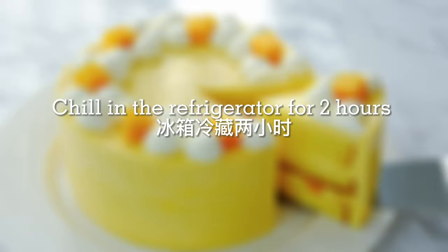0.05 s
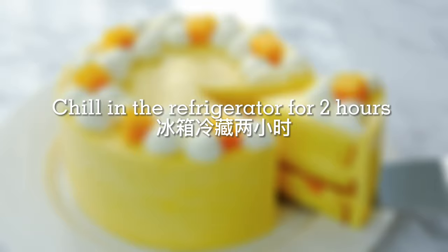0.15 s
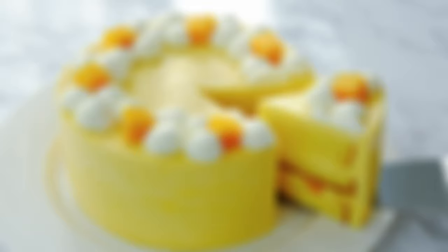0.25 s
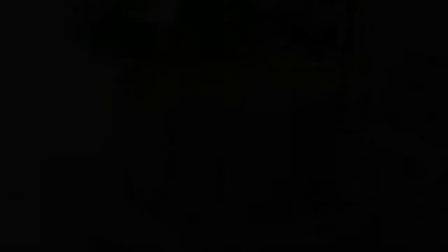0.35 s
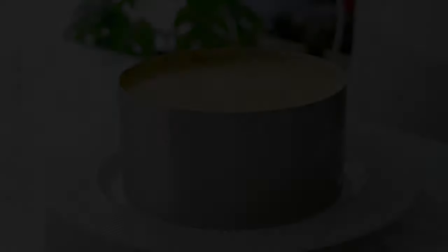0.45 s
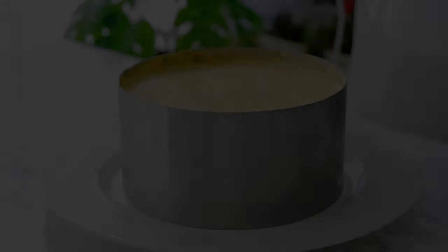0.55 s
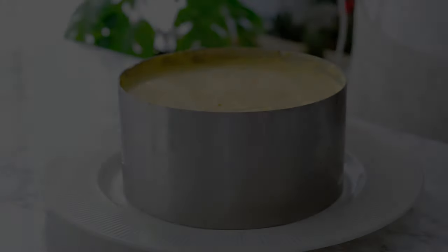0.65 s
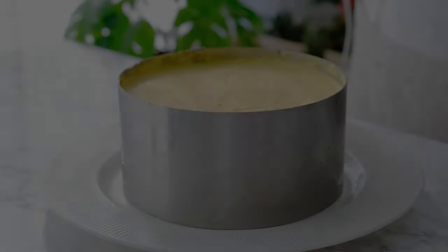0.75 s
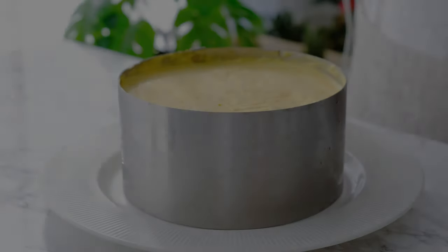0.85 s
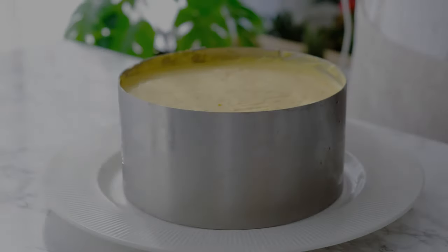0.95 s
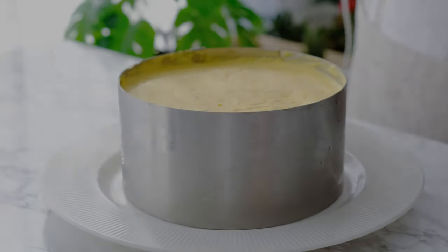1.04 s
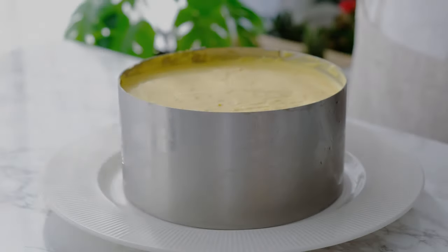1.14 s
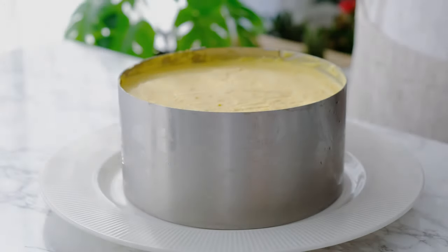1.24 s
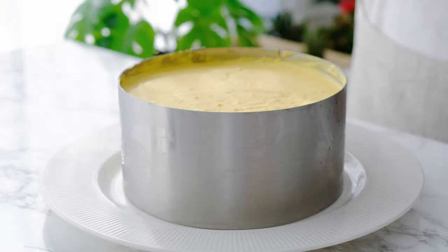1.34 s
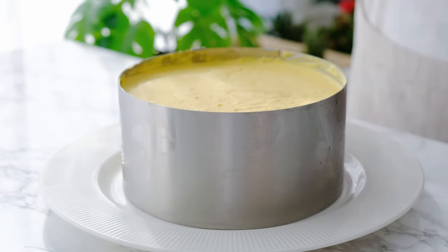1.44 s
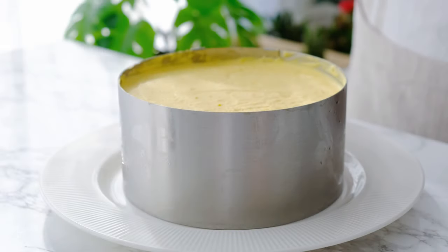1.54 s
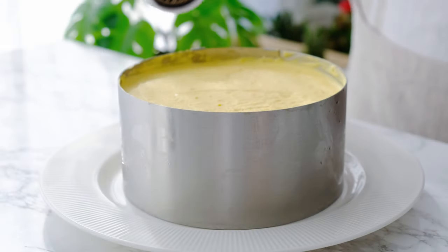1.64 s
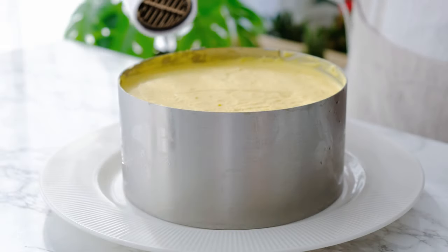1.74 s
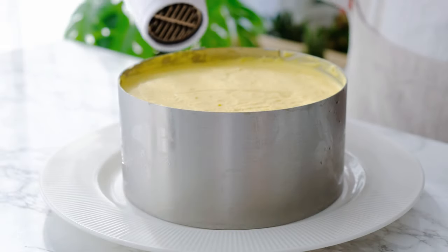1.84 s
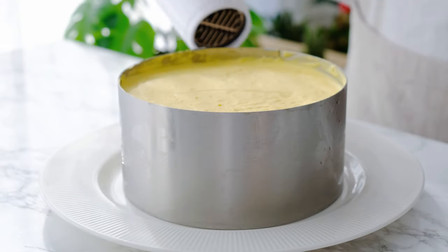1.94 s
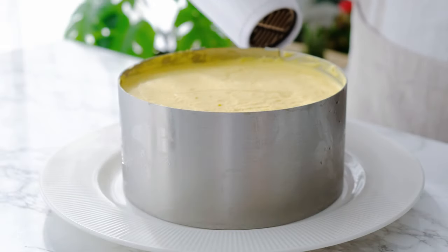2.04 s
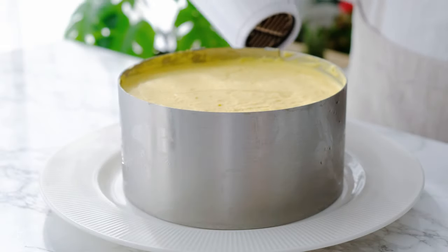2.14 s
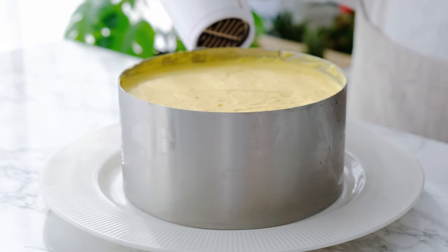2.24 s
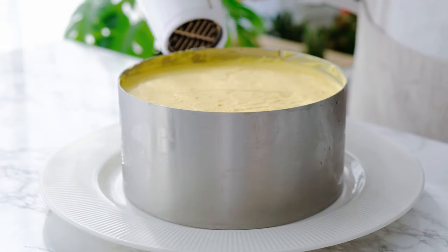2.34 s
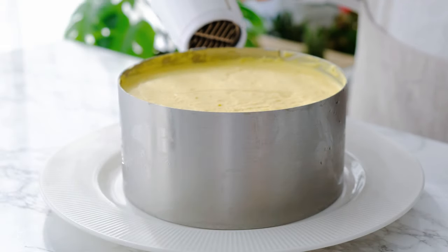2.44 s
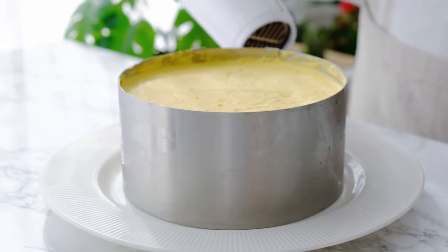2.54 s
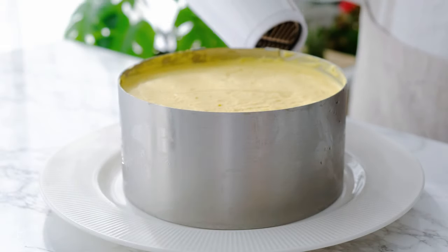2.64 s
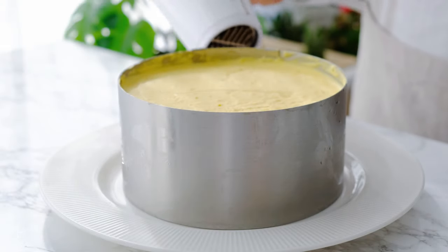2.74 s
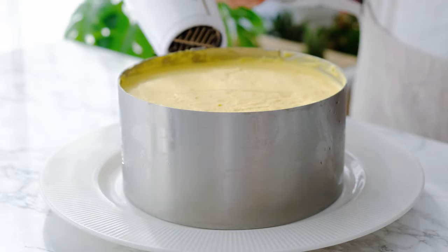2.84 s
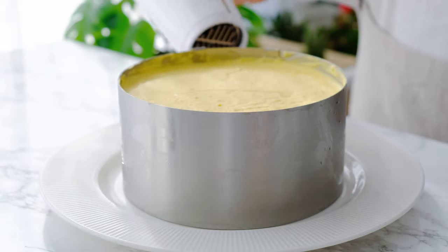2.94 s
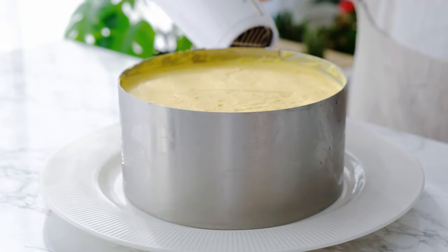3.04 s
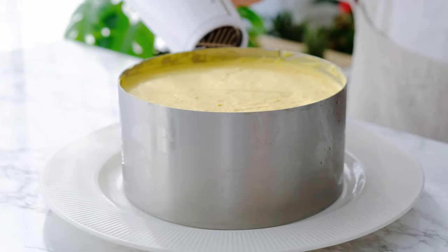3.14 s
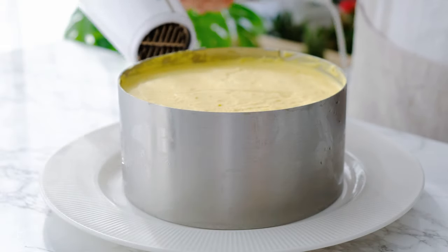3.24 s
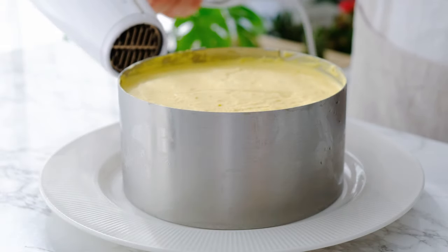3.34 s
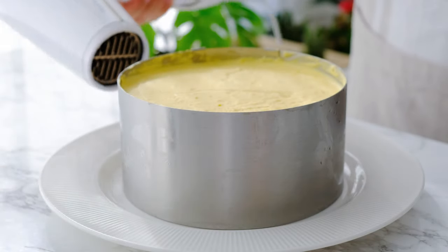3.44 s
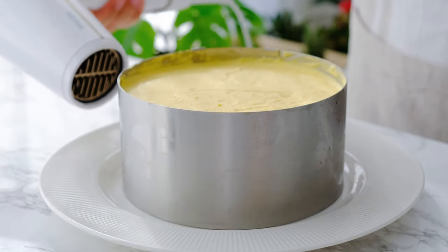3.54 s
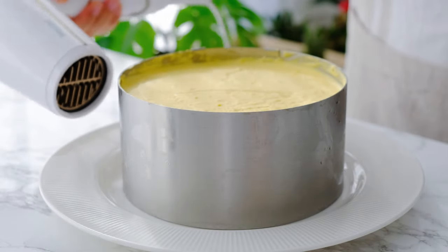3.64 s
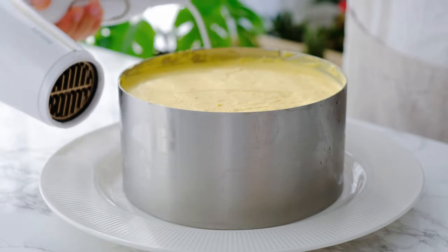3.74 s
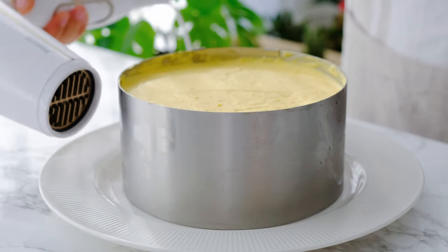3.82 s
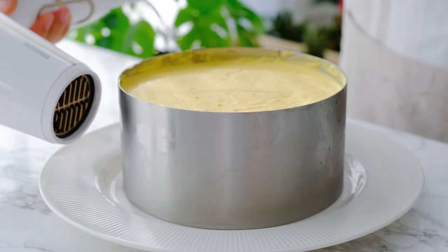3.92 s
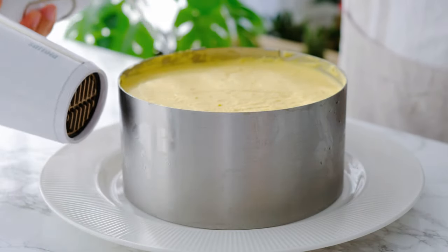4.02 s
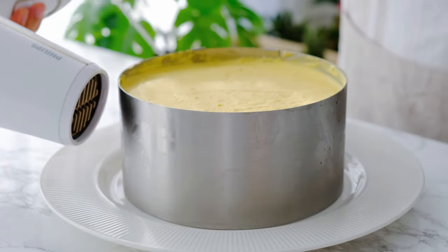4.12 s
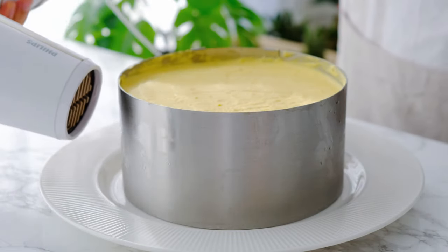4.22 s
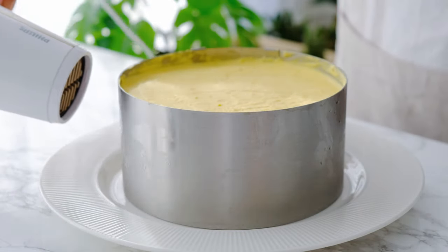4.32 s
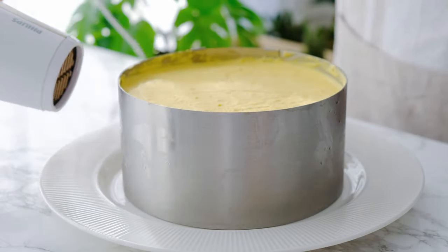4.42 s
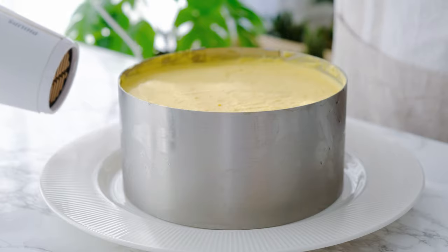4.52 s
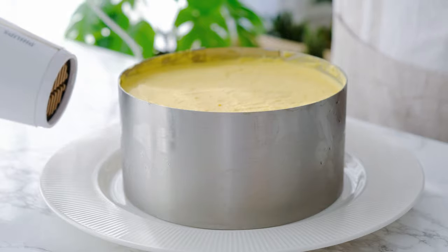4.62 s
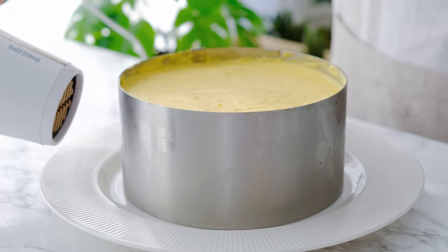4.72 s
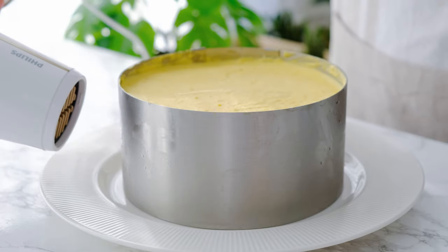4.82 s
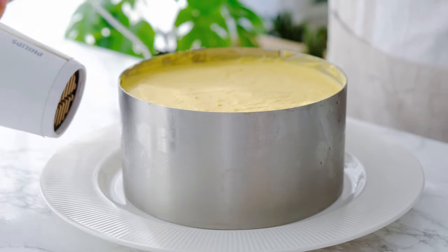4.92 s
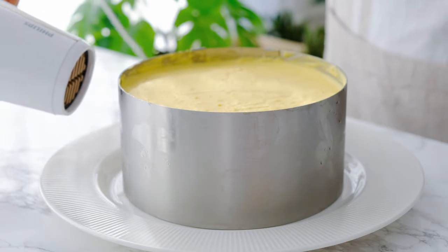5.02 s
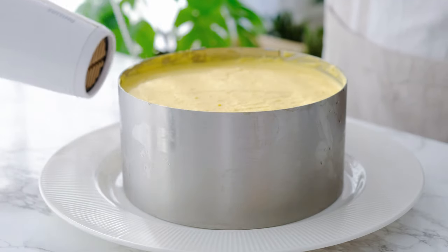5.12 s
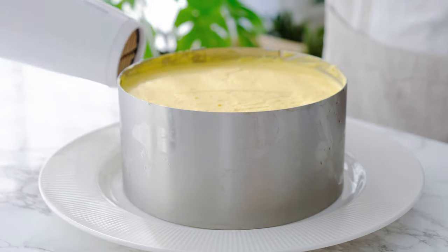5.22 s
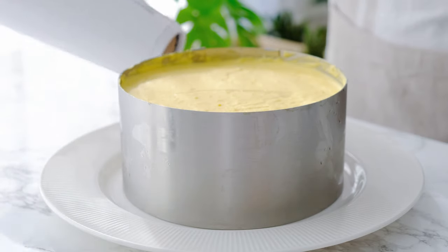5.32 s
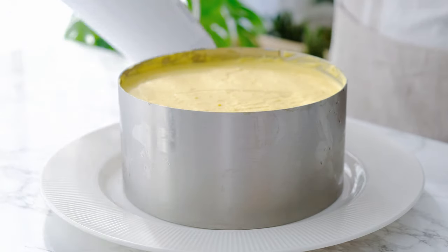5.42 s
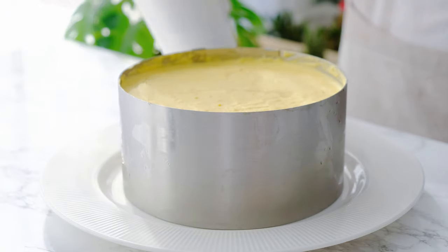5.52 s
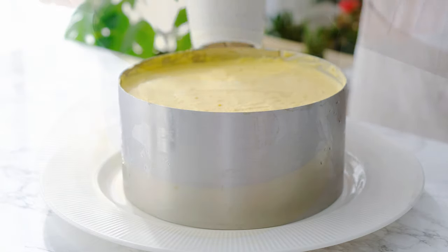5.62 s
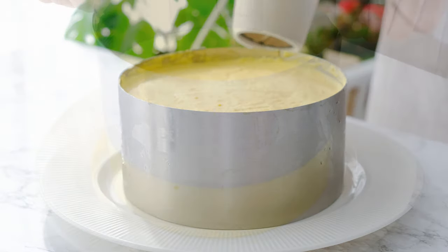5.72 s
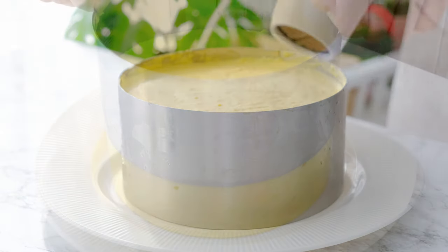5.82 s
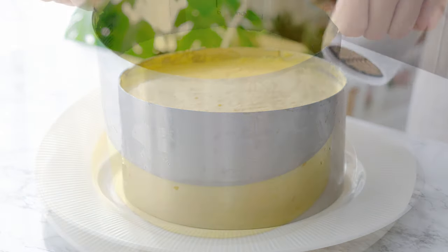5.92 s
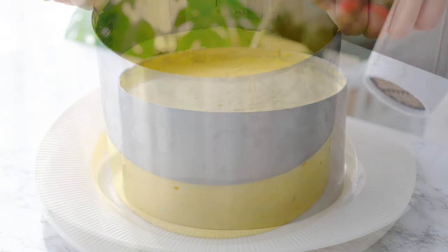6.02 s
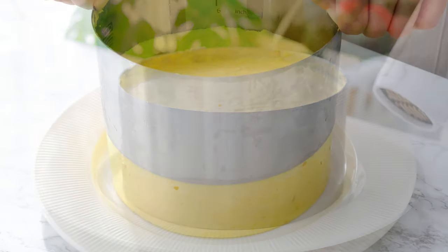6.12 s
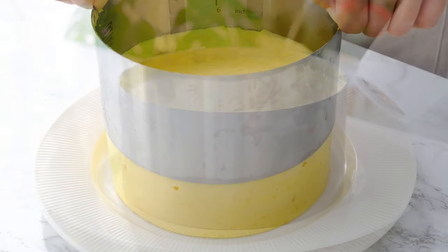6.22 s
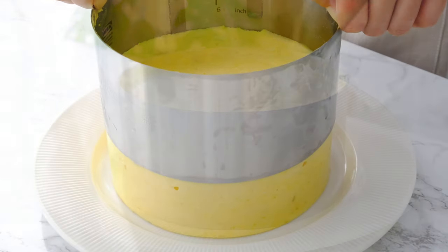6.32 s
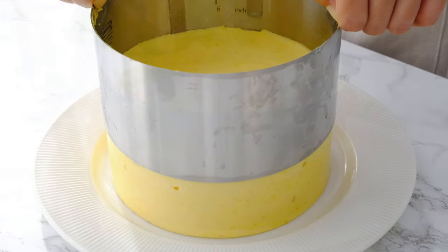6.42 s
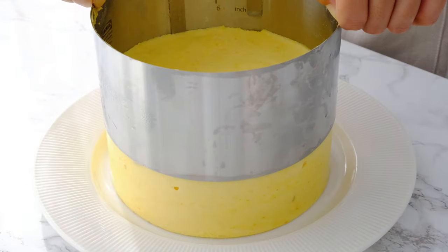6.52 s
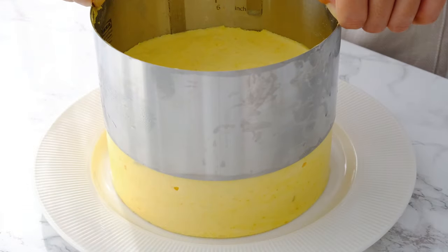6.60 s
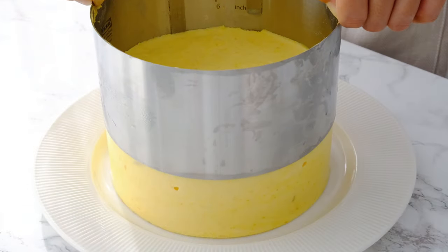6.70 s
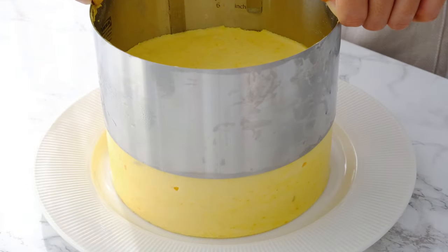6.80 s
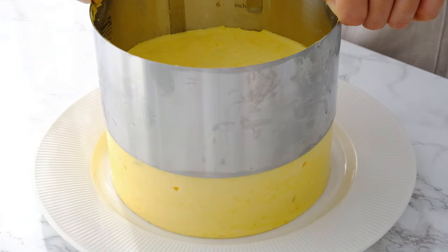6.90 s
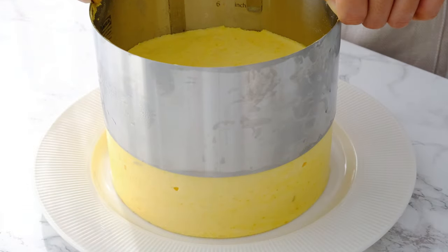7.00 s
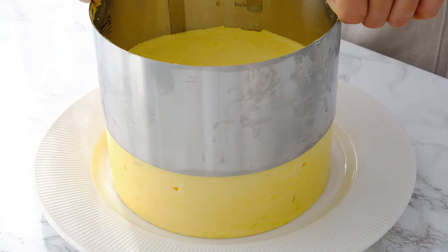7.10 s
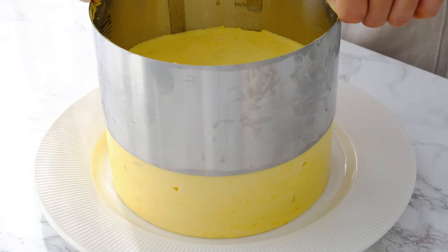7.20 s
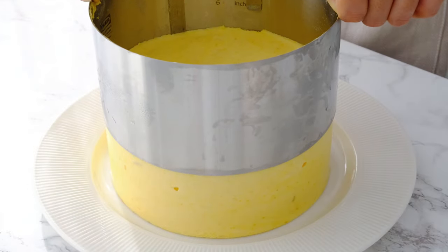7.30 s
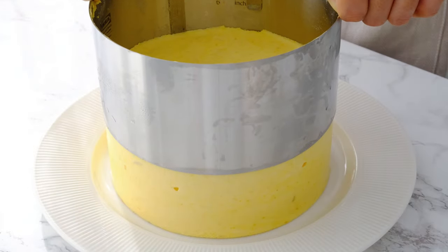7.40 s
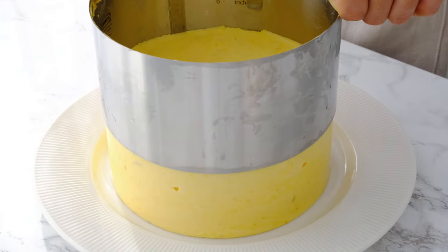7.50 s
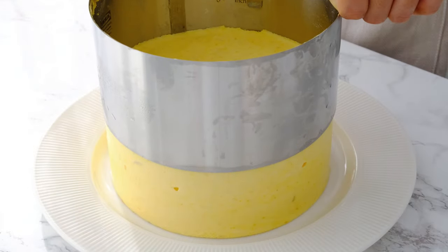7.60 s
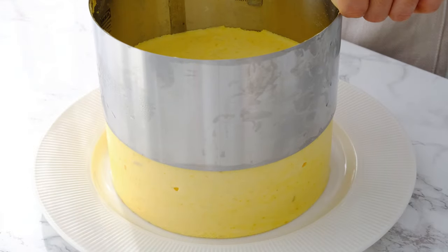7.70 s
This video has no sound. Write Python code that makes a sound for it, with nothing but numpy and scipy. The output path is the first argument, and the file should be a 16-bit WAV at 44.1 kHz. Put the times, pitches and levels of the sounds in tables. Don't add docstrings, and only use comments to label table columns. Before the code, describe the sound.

After near silence a hand-held hair dryer spins up, roars and whines close by, turns aside, fades, then light ticks and soft rubbing of a steel ring.

```python
import sys
import numpy as np
from scipy import signal
from scipy.io import wavfile
from scipy.ndimage import uniform_filter1d

SR = 44100
rng = np.random.default_rng(int(sys.argv[2]) if len(sys.argv) > 2 else 0)


def master(y):
    cut = np.clip(np.atleast_2d(y).T, -1, 1)
    pcm = np.round(cut * 32767)
    wavfile.write(sys.argv[1], SR, pcm.astype(np.int16))


def invert_db(x):
    u = np.asarray(x, float) / 20
    return 10 ** u


N = 341943


def evened(x):
    return x / np.sqrt(np.mean(x ** 2) + 1e-20)


def read(points, hz):
    f, value = np.transpose(points)
    return np.interp(np.log(hz + 1), np.log(f + 1), value)


def follow(rows, t):
    s, *columns = np.transpose(rows)
    return np.array([np.interp(t, s, c) for c in columns])


def blend(place, count):
    return np.maximum(1 - abs(place[:, None] - np.arange(count)), 0)


def bump(x, centre, width):
    return np.exp(-((x - centre) / width) ** 2)


def bumps_db(t, rows):
    return sum(db * bump(t, s, length) for s, length, db in rows)


def gate(t, start, end):
    return np.clip((t - start) * 50, 0, 1) * np.clip((end - t) * 10, 0, 1)


def grid():
    return np.fft.rfftfreq(1024, 1 / SR), np.arange(N // 256 + 5) * 256 / SR


def patches(bins, frames):
    hz, t = grid()
    field = rng.standard_normal((len(t), len(hz))).T
    return evened(uniform_filter1d(uniform_filter1d(field, bins, 0), frames, 1))


# f/Hz, level/dB
SIDE_TILT = [(100, -11), (1000, -13.5), (4000, -7), (10000, 1), (15000, 3)]


def noise(gain, side_db=0):
    a, b, c, d = rng.standard_normal(gain.shape[::-1] + (4,)).T
    tilt_db = read(SIDE_TILT, grid()[0])[:, None]
    spread_db = side_db + tilt_db + 4.6 * patches(bins=30, frames=6)
    z = np.array([a + 1j * b, (c + 1j * d) * invert_db(spread_db)])
    unit = np.std(signal.istft(z[0], nperseg=1024, noverlap=768)[1]) / np.sqrt(len(gain))
    return signal.istft(z * gain, nperseg=1024, noverlap=768)[1][:, :N] / unit


def resonate(x, hz, width):
    turn = np.exp(2j * np.pi * hz * np.arange(len(x)) / SR)
    r = np.exp(-np.pi * width / SR)
    return 2 * (turn * signal.lfilter([1 - r], [1, -r], x / turn)).real


# f/Hz, level/dB
ROOM = [(15, -41), (25, -28), (98, -14.5), (151, -5), (203, -9.5), (347, -5.5), (419, -7), (1330, -13.5),
        (1480, -14), (1600, -17), (15300, -23)]
ROOM_DB = -69
# t/s, level/dB
ROOM_IN = [(5.5, -41), (5.7, -10), (5.95, 3), (6.2, 1.5), (7.75, 2.5)]
FRIDGE_HZ = 49.43
# order (multiple of FRIDGE_HZ), then the level/dB of each
FRIDGE_ORDERS = [1, 1.36, 2, 3, 5, 7, 9, 10, 11, 12, 14, 26, 32, 287.3]
FRIDGE = [-88, -88, -89, -84, -86, -78, -87, -84, -88, -88, -89, -87, -88, -100]


def kitchen(t):
    hz, frames = grid()
    colour = invert_db(read(ROOM, hz))
    colour = (colour / np.linalg.norm(colour))[:, None]
    hiss = noise(invert_db(ROOM_DB + 0.88 * patches(bins=8, frames=20)) * colour)
    hum = sum(invert_db(db) * np.sin(2 * np.pi * (k * FRIDGE_HZ * t + rng.random()))
              for k, db in zip(FRIDGE_ORDERS, FRIDGE))
    hum = np.sqrt(2) * hum * [[1], [0]]
    return invert_db(follow(ROOM_IN, t)[0]) * (hiss + hum)


# t/s, length/s, counter level/dB, plate level/dB
RUB = [
    (6.88, .05, -61, -72),
    (6.94, .045, -70, -62),
    (7.07, .055, -60, -66),
    (7.2, .04, -71, -66),
    (7.33, 0.046, -59, -65),
    (7.45, .06, -70, -72),
]
# start t/s, end t/s, counter level/dB, plate level/dB
SLIDE = (7, 7.58, -71, -72)
# f/Hz, width/Hz, level/dB
COUNTER = [(150, 25, -4.5), (190, 15, 1.5)]
# f/Hz, width/Hz, level/dB
PLATE = [(248, 30, 3.5), (287, 19, 3), (336, 38, 1.5), (600, 250, -15)]


def rub(t):
    size = invert_db(2.3 * np.minimum(rng.exponential(1, N), 3))
    slips = size * (rng.random(N) < 900 / SR) * rng.choice([-1, 1], N)
    bodies = [sum(invert_db(db) * evened(resonate(resonate(slips, hz, 2 * w), hz, w)) for hz, w, db in modes)
              for modes in (COUNTER, PLATE)]
    start, end, *glide_db = SLIDE
    force = invert_db(np.array(glide_db))[:, None] * gate(t, start, end)
    force = force + sum(invert_db(np.array(db))[:, None] * bump(t, s, length) for s, length, *db in RUB)
    return sum(f * b / np.sqrt(uniform_filter1d(b ** 2, size=3000)) for f, b in zip(force, bodies))


# t/s, level/dB, dullness 0-1
TICKS = [
    (6.522, -57, 0),
    (6.524, -54, 1),
    (6.528, -50.5, 1),
    (6.533, -64, 1),
    (6.5965, -42, 0),
    (6.6055, -47, 0),
    (6.613, -58, 0),
    (6.621, -63, 0),
]
# f/Hz, level/dB, t60/s
BRIGHT = [(4527, 0, .02), (3483, -9, .018), (1723, -16, .02), (2150, -17, .012), (2700, -17, .012),
          (5300, -16, .008)]
# f/Hz, level/dB, t60/s
DULL = [(1340, 0, .03), (1080, -5, .03), (2697, -9, .018), (3600, -14, .012), (4500, -14, .012)]
# level/dB, t60/s
ECHO = (-17, .12)


def ticks(t):
    out = np.zeros(N)
    for s, peak_db, dull in TICKS:
        u = np.clip(t - s, 0, .2)
        modes = DULL if dull > .5 else BRIGHT
        ring = sum(invert_db(db - 60 * u / t60) * np.sin(2 * np.pi * hz * u) for hz, db, t60 in modes)
        out += invert_db(peak_db) * ring * (1 - np.exp(-u / 0.001))
    echo_db, t60 = ECHO
    tail = rng.standard_normal(SR // 2) * invert_db(-60 * np.arange(SR // 2) / SR / t60)
    return out + invert_db(echo_db) * signal.oaconvolve(out, tail / np.linalg.norm(tail))[:N]


SWITCH_S = .567
# level/dB, length/s
SWITCH = (-82, .02)


def switch(t):
    s, (db, length) = SWITCH_S, SWITCH
    burst = rng.standard_normal(N) * (t > s) * (t < s + length) * np.exp(-abs(t - s) / .008)
    return invert_db(db) * 4.0 * (resonate(burst, 1500, 1500) + 0.45 * resonate(burst, 4000, 3000))


RISE_S, RISE_LENGTH_S, RISE_DB_PER_DECADE = 0.57, 0.51, 46.5
# t/s, level/dB
NEAR = [(1.07, -50.5), (1.28, -46.5), (1.45, -42), (1.84, -39), (2.6, -39.5), (3.1, -37.5), (3.6, -38),
        (3.84, -40.5), (3.96, -38), (4.45, -40.5), (4.7, -39.5), (5.3, -40), (5.5, -41.5), (5.75, -48),
        (6.02, -52), (6.15, -63.5), (6.51, -71.5)]


def loudness_db(t):
    rise = np.clip((t - RISE_S) / RISE_LENGTH_S, 1e-3, 1)
    return follow(NEAR, t)[0] + RISE_DB_PER_DECADE * np.log10(rise)


# t/s, pose 0-4 (starting, facing, aside, behind the ring, leaving)
TURN = [
    (1.2, 0),
    (1.5, 1),
    (3.39, 1),
    (3.46, 2),
    (5.45, 2),
    (5.62, 3),
    (5.85, 3),
    (5.95, 4),
]


def nozzle_pose(t):
    return follow(TURN, t)[0]


TOP_HZ, SPIN_S, SPIN_UP_S = 1670, .4955, .3694
BLADES = 7
WHINE_S = (.79, 6.44)
# t/s, speed/(m/s)
APPROACH = [(1.2, 0), (1.37, 1.3), (1.65, .1), (2, -.2), (3.2, .15), (3.7, -.9), (4.2, -.9), (5, .4),
            (5.55, -1.3), (6.3, .5)]
SHAFT = [1, 5, 6, 7, 14, 21]
# starting, facing, aside, behind level/dB
SHAFT_DB = [
    (-38, -27.5, -35.5, -35),
    (-28, -24, -27, -38),
    (-32, -15, -38, -34),
    (-1, -1, -3, -7.5),
    (-25, -14, -33, -28),
    (-30, -23, -42, -42),
]
STANDING = {7: [(1.2, 0.2, 7), (1.49, .075, -10), (1.75, 0.23, 7.5), (2.35, 0.091, 4.5), (2.85, 0.058, 5.5),
            (3.34, 0.11, 5), (3.65, 0.2, -9), (4.5, 0.046, -2.5), (5.33, 0.12, -9.5), (5.55, 0.053, 4),
            (5.82, .05, -12), (5.95, .07, 6), (6.25, .12, -4), (3.5, .05, -6), (3.41, .03, 4),
            (.88, .06, 1)], 5: [(4.6, 0.83, 8.5)], 14: [(1.15, .15, 6), (2.0, 0.27, -5), (3.0, .4, 3)],
            21: [(2.3, .2, -12)]}
START_HZ = 730
# t/s, level/dB
START_HUM = [(.61, -97), (.7, -82), (.8, -78), (.95, -74), (1.2, -70), (1.45, -73)]


def fan(t):
    doppler = 1 + follow(APPROACH, t)[0] / 343
    blade_hz = TOP_HZ * np.tanh((t - SPIN_S) / SPIN_UP_S) * doppler
    shaft = 2 * np.pi * np.cumsum(blade_hz / BLADES) / SR
    frames = grid()[1]
    pose = blend(np.minimum(nozzle_pose(frames), 3), count=4)
    level_db = loudness_db(frames) + (pose @ np.transpose(SHAFT_DB)).T
    whine = np.zeros(N)
    for k, db in zip(SHAFT, level_db):
        db = db + bumps_db(frames, STANDING.get(k, []))
        whine += np.interp(t, frames, invert_db(db)) * np.sin(k * shaft)
    flutter = evened(uniform_filter1d(uniform_filter1d(rng.standard_normal(N), size=600), size=600))
    whine = whine * invert_db(1.2 * flutter)
    fuzz = evened(resonate(rng.standard_normal(N), START_HZ, 25.0))
    hum = np.sin(2 * np.pi * START_HZ * t) + 0.49 * fuzz
    hum = invert_db(follow(START_HUM, t)[0]) * evened(hum) * gate(t, START_HUM[0][0], START_HUM[-1][0])
    return np.sqrt(2) * (whine * gate(t, *WHINE_S) + hum)


AIR_END_S = 6.68
# f/Hz, level/dB (per Hz)
STARTING = [(40, -50), (100, -36), (250, -13), (400, 0.5), (600, -1), (700, -2), (1000, -1.5), (1500, 4),
            (2000, -2), (3000, -4), (5000, -6.5), (8000, -10.5), (11000, -18.5), (15500, -30)]
FACING = [(40, -84), (100, -24), (250, -11.5), (500, -0.5), (720, 2.5), (800, -15.5), (900, -3.5),
          (1000, -1.5), (2350, -1.5), (2550, -4.5), (5000, -9.5), (8000, -18), (11000, -25.5), (15500, -33)]
ASIDE = [(40, -57), (100, -23.5), (250, -11.5), (400, -7), (580, 2), (700, -2.5), (880, -10), (1300, -7.5),
         (1680, -5), (2000, -7.5), (4500, -8.5), (8000, -16.5), (11000, -26.5), (15500, -33.5)]
BEHIND = [(40, -40), (100, -24), (300, -8), (550, 2), (800, -3.5), (1050, 3), (1300, -11), (1650, -3.5),
          (1850, -9), (2400, -4), (2900, -12.5), (4500, -11), (8000, -18.5), (15500, -31)]
LEAVING = [(40, -30), (100, -10), (250, -12), (450, 0), (650, -6), (1300, -5), (1680, 2.5), (2000, 1),
           (4500, -5), (5500, -12), (8000, -20), (15500, -32)]
# f/Hz, width/Hz, level/dB
BARREL = [(3900, 120, 2), (4490, 310, 4), (5185, 85, 3), (6220, 120, 3), (7500, 670, 1), (2950, 60, 2)]
# t/s, f/Hz, level/dB
RIM = [(1.3, 2070, 4), (1.45, 2120, -5), (1.9, 2180, -1.5), (2.3, 2300, 1.5), (2.8, 2240, 3),
       (3.15, 2250, 7), (3.42, 2140, 1), (3.53, 2260, 5), (3.7, 2190, -4)]
# low f/Hz, high f/Hz
AIR_BANDS = [(150, 850), (1750, 3200), (3450, 7000), (7500, 15000)]
# roar, body, hiss, fizz level/dB
BALANCE_DB = [
    (-4, 0, 1, -7),
    (-1.5, 0, -1.5, -11.5),
    (-1.5, 0, -1.5, -11),
    (-4.5, 0, 0, -11.5),
    (-3, 1, -1, -14),
]
# t/s, length/s, f/Hz, width/Hz, level/dB
SWEEPS = [(1.51, 0.077, 1480, 105, 10.5), (1.47, 0.15, 100, 45, 11), (2.0, 0.049, 2150, 210, 7.5),
          (2.18, 0.18, 4420, 150, 5), (2.4, .06, 4600, 150, 5), (2.8, 0.06, 2260, 130, 6),
          (3.305, 0.079, 3940, 220, 4), (3.54, 0.06, 2260, 130, 6), (4.0, 0.092, 3140, 170, 5),
          (5.3, 0.092, 4000, 250, 6), (5.45, 0.22, 1560, 85, 9), (8, 0.13, 2100, 300, 1.5),
          (2.25, 0.07, 2300, 120, 5), (2.53, 0.06, 2250, 150, 6), (3.21, .05, 2000, 130, 6),
          (5.75, .12, 2350, 120, 3), (5.99, 0.05, 3500, 800, 4), (1.43, 0.26, 687, 71, -7.5),
          (6.52, .08, 2100, 680, 6.5), (3.04, 0.18, 2010, 46, 9), (3.7, 0.087, 5300, 4200, 3),
          (2.68, 0.18, 4500, 1500, 2.5), (2.73, 0.16, 680, 190, 2)]
# t/s, length/s, level/dB
BEAM = [
    (1.05, .06, 2.5),
    (1.25, 0.1, -7),
    (1.798, .15, 2.5),
    (3.62, .12, 3),
    (4.65, 0.37, -2.5),
    (5.3, 0.11, 2.5),
    (6.05, .08, -5),
]
BEAM_HZ, BEAM_WIDTH_HZ = 12600, 4300
# f/Hz, t/s
SHADOW = [(200, 3.385), (1000, 3.425), (1750, 3.43), (2250, 3.52), (2800, 3.41), (5000, 3.39), (9000, 3.35),
          (15000, 3.345)]
# f/Hz, level/dB
SHADOW_DB = [(300, -9.5), (2200, -10), (5000, -11.5), (11000, -10)]
SHADOW_S, EDGE_S, EDGE_SIDE_DB = .035, .035, 22


def air():
    hz, t = grid()
    bins = hz[:, None]
    colours = np.array([read(c, hz) for c in (STARTING, FACING, ASIDE, BEHIND, LEAVING)])
    pose = blend(nozzle_pose(t), len(colours))
    barrel_db = sum(db * bump(hz, f, w) for f, w, db in BARREL)
    shape_db = (pose @ colours + barrel_db).T
    rim_hz, rim_db = follow(RIM, t)
    shape_db = shape_db + rim_db * gate(t, RIM[0][0], RIM[-1][0]) * bump(bins, rim_hz, 150.)

    sums = [np.sum(invert_db(2 * shape_db[(hz > lo) & (hz < hi)]), 0) for lo, hi in AIR_BANDS]
    lift_db = loudness_db(t) + (pose @ BALANCE_DB).T - 10 * np.log10(sums)
    centres = [np.log(lo * hi) / 2 for lo, hi in AIR_BANDS]
    place = np.interp(np.log(hz + 1), centres, range(len(AIR_BANDS)))
    shape_db = shape_db + blend(place, len(AIR_BANDS)) @ lift_db

    s, length, f, w, db = np.transpose(SWEEPS)
    shape_db = shape_db + (db * bump(bins, f, w)) @ bump(t[:, None], s, length).T
    shape_db = shape_db + bump(bins, BEAM_HZ, BEAM_WIDTH_HZ) * bumps_db(t, BEAM)
    since = t - read(SHADOW, hz)[:, None]
    shape_db = shape_db + read(SHADOW_DB, hz)[:, None] * np.clip(since / SHADOW_S + .5, 0, 1)

    texture_db = 0.94 * patches(bins=2, frames=150) + 1.04 * patches(bins=8, frames=24)
    texture_db = texture_db + 0.26 * patches(bins=200, frames=6)
    gain = invert_db(shape_db + texture_db) * gate(t, RISE_S, AIR_END_S)
    edge_side_db = (EDGE_SIDE_DB - read(SIDE_TILT, hz)[:, None]) * bump(since, 0, EDGE_S)
    return noise(gain, edge_side_db)


# t/s, side level/dB
WIDTH = [(.5, -37), (5.4, -35), (5.85, -22), (6.4, -13), (7.75, -16)]
# t/s, share (0-1)
LEAN = [(5.42, 0), (5.5, 0.27), (5.6, 0.048), (5.66, 0), (5.85, 0), (5.9, .3), (6.1, 0.16), (6.4, 0)]


def scene():
    t = np.arange(N) / SR
    mid, side = kitchen(t) + air()
    mid = mid + rub(t) + ticks(t) + switch(t) + fan(t)
    side = side * invert_db(follow(WIDTH, t)[0]) + resonate(mid, TOP_HZ, 150.) * follow(LEAN, t)[0]
    return np.array([mid + side, mid - side])


def roll_off(x):
    return signal.sosfilt(signal.butter(12, 15430, fs=SR, output="sos"), x)


MIC_HZ, EDGE_HZ = 43, 15440


def record(dry):
    cut = signal.sosfilt(signal.butter(2, MIC_HZ, "high", fs=SR, output="sos"), dry)
    lowpass = signal.firwin(801, EDGE_HZ, window=("kaiser", 8), fs=SR)
    limited = signal.oaconvolve(cut, lowpass[None], "same")
    return roll_off(limited)


dry = scene()
out = record(dry)
master(out)
```